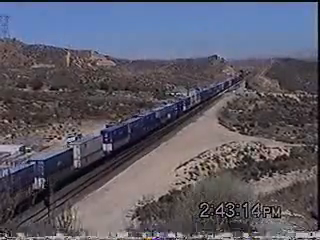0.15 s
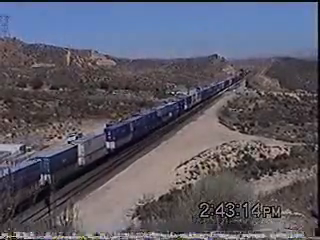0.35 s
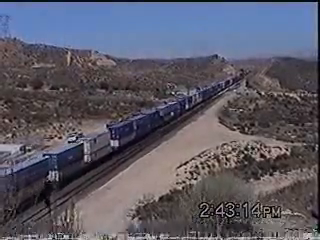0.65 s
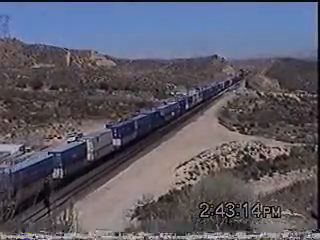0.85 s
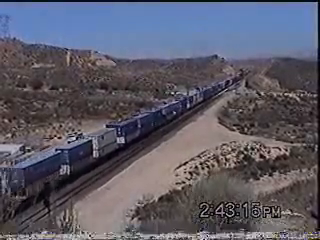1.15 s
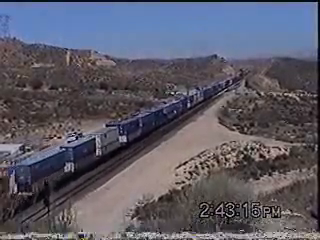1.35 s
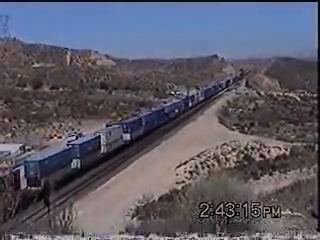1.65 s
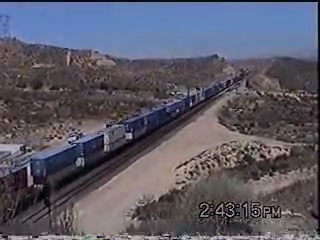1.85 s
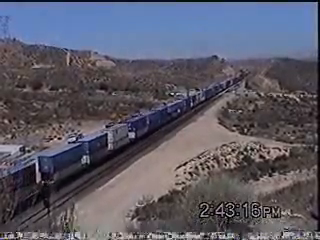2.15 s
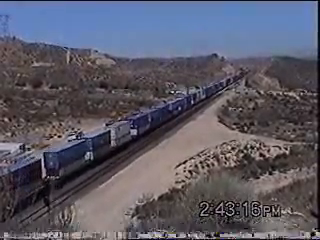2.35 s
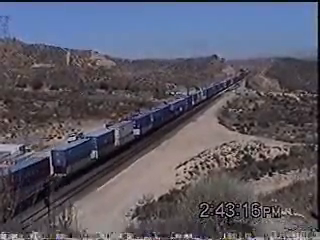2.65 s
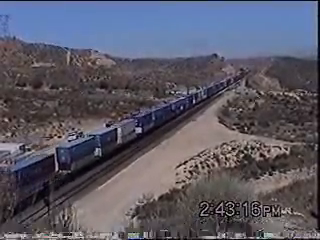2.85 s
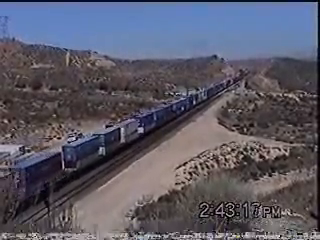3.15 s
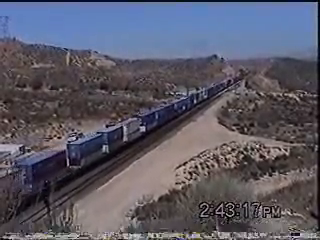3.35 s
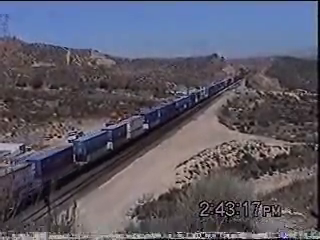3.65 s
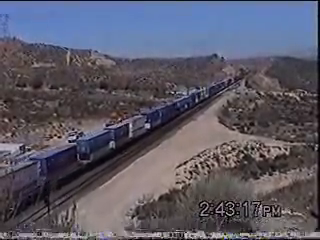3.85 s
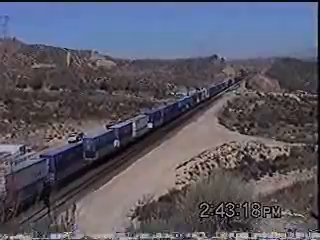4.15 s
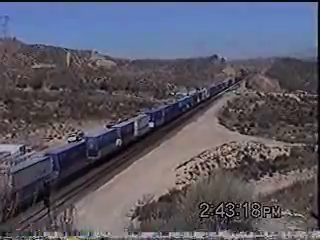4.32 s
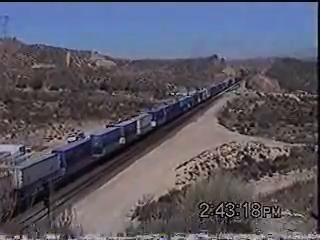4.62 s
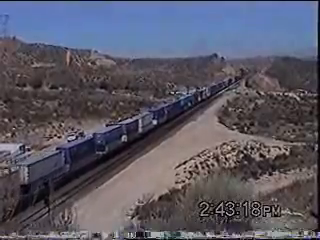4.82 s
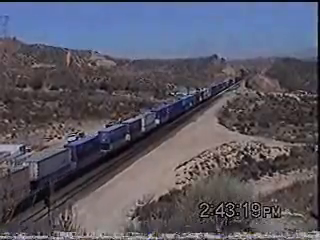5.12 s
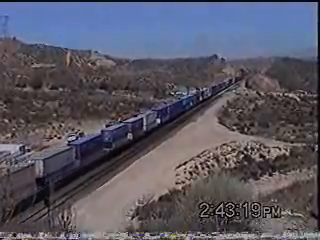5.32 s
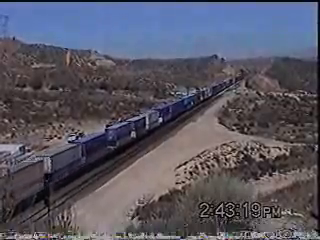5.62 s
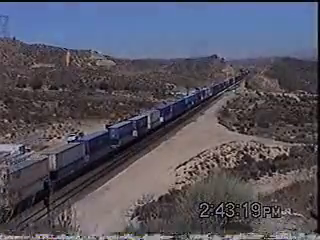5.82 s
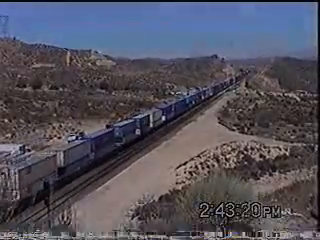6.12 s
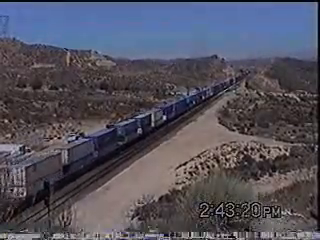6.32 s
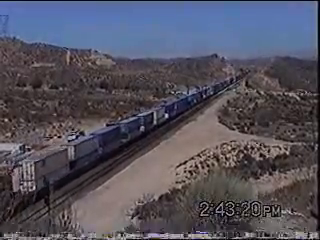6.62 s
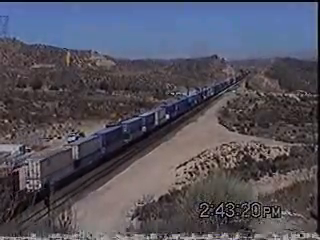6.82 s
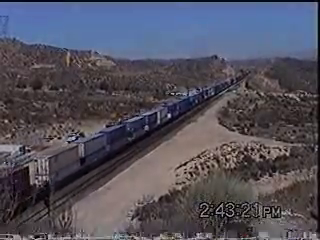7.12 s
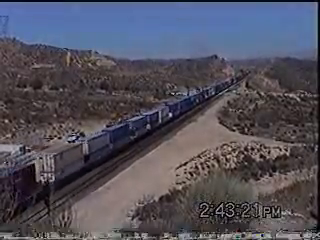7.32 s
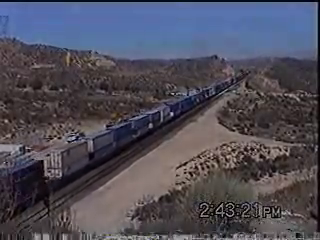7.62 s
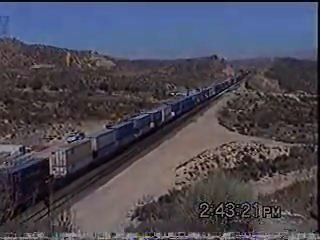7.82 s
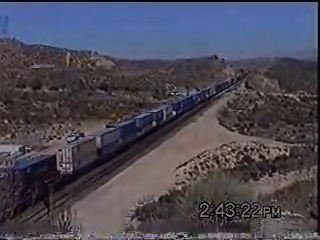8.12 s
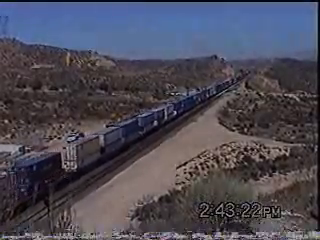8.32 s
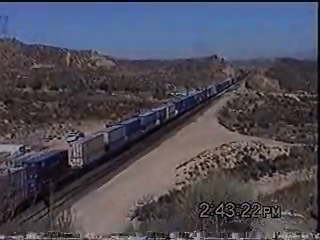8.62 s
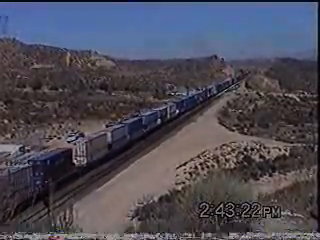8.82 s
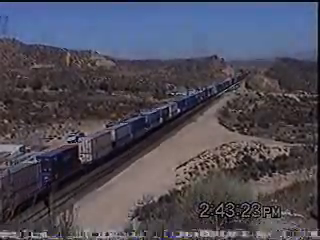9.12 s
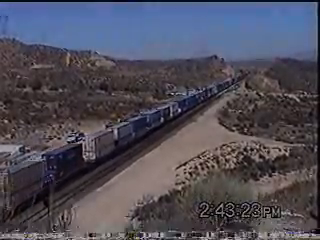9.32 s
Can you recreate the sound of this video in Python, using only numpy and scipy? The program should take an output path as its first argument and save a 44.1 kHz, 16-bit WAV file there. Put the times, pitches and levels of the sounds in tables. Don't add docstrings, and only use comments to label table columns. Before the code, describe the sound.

Outdoors beside a railway in dry hills, a long freight train passes throughout: a steady low rumble, mid-range rail roar and fine high wheel hiss, throbbing slightly and swelling a little as wagons go by. Soft wind thuds begin at 0.2 s; a violent gust breaks over the microphone from 0.6 to 1.2 s, with rough puffs, brief airy whistles and squared-off bass thumps. From about 1.7 to 4 s the train dominates, with only isolated thumps. Another sharp gust hits at 4.2-4.8 s, then calm. The longest rough burst runs from 5.8 to 7 s, strongly distorted. Short treble scrapes and a thin, unsteady flange squeal surface around 6.8-7.3 s. After a brief easing, breathy, fluttering gusts return from 7.8 s and continue unevenly to the end near 9.5 s, the train still rolling. Sound is close, mono, dull on top and overloaded in gusts.

```python
import sys
import numpy as np
from scipy import signal
from scipy.fft import rfft, irfft, next_fast_len
from scipy.io import wavfile
from scipy.ndimage import uniform_filter1d, map_coordinates

SR = 44100
rng = np.random.default_rng(int(sys.argv[2]) if len(sys.argv) > 2 else 0)


def invert_db(level):
    return 10 ** (np.asarray(level, dtype=float) / 20)


def digitize_waveform(pressure):
    field = np.atleast_2d(pressure).T
    bounded = np.clip(field, -1, 1)
    quanta = np.round(bounded * 32767).astype(np.int16)
    wavfile.write(sys.argv[1], SR, quanta)


N = 417627

# time_s, weight_db, tread_roughness_db
WAGONS = [(0, -22, -48.5), (1, -16, -44.5), (1.9, -22, -46), (2.55, -22.5, -46.5), (2.68, -19, -40),
          (2.93, -19.5, -43.5), (3.15, -23, -48), (3.5, -24, -48.5), (4.4, -18, -43), (5.2, -25.5, -45),
          (6.2, -17.5, -39), (7.4, -23.5, -42), (8.1, -19.5, -38.5), (9.47, -25, -37)]
# frequency_hz, level_db
RUMBLE_SPECTRUM = [(20, -6), (55, -13.5), (68, -5.5), (90, -1.5), (200, 1), (400, -4), (550, -13),
                   (800, -32.5), (1500, -68)]
# frequency_hz, level_db
RAIL_SPECTRUM = [(260, -31.5), (480, -8), (1000, -10), (1700, -13), (2700, -15), (3900, -21.5), (4500, -25),
                 (6000, -49.5), (9000, -120)]
# frequency_hz, level_db
HISS_SPECTRUM = [(2470, -24), (4200, -9.5), (4920, 7.5), (5310, 5), (5870, 4), (7400, -1.5), (9620, -35.5),
                 (16300, -120)]
# start_s, peak_db, hold_s
SCRAPES = [(0.355, -43, .012), (.73, -41.5, 0.01), (2.324, -44, 0.029), (2.682, -57, 0.045),
           (4.497, -45, 0.031), (4.71, -40, 0.03), (5.836, -29.5, 0.018), (6.853, -36.5, 0.065),
           (6.927, -39, .04), (7.05, -37, 0.054), (7.274, -40.5, .04), (7.51, -46, 0.035),
           (7.88, -40.5, .06), (8.166, -50.5, 0.023), (8.397, -47.5, 0.029)]
# pitch_hz, level_db
FLANGE_MODES = [
    (4880, -33.5),
    (5750, -39),
    (6150, -44),
]
# time_s, strength_db, eddy_size (0 large, 2 small)
WIND = [(0, -27.5, 0.92), (0.55, -27, -0.36), (0.75, -14, 1.4), (1.05, -17.5, 0.36), (1.5, -29.5, -0.0058),
        (2.5, -29.5, 0.18), (2.8, -29, 1.04), (3.2, -28.5, -0.11), (4.1, -27, 0.24), (4.4, -12.5, 1.4),
        (4.9, -27, 0.9), (5.7, -25.5, 0.29), (6.05, -10.5, 0.72), (6.5, -14, 1.13), (7.2, -23, 0.44),
        (8.1, -19, 1.17), (8.9, -17, 0.84), (9.47, -18, 0.75)]
# start_s, hold_s, strength_db, eddy_size (0 large, 2 small)
SWELLS = [(0.621, 0.069, -17, 1), (0.71, 0.14, -10, 0.88), (0.75, 0.13, -8.5, 2.5),
          (0.92, 0.092, -11.5, 0.97), (1.06, 0.14, -23.5, 2.4), (1.09, 0.066, -17, 0),
          (4.098, 0.035, -16.5, 0), (4.252, 0.17, -16.5, 0.99), (4.287, 0.07, -15.5, 0),
          (4.407, 0.22, -16, 2.7), (4.477, 0.12, -16, 0), (4.691, 0.075, -17, 0.85), (5.824, 0.2, -14, 1.7),
          (5.895, 0.035, -11, 2.2), (5.894, 0.085, -10, 0.36), (6.108, 0.11, -11.5, 0),
          (6.178, 0.24, -16, 1.7), (6.248, 0.06, -10.5, 0.21), (6.298, 0.3, -17, 0),
          (6.308, 0.23, -19.5, 1.8), (6.553, 0.013, -9, 1.3), (6.667, 0.047, -16, 2),
          (6.821, 0.14, -21, 0.5), (6.841, 0.025, -15.5, 2), (7.809, 0.2, -17, 0.34), (8.034, 0.26, -22, 2),
          (8.064, 0.14, -16.5, 0.2), (8.233, 0.2, -17, 0.86), (8.687, 0.032, -15, 1.2),
          (8.797, 0.24, -17, 1.2)]
# centre_hz, width_hz
EDDY_BANDS = [
    (430, 490),
    (1080, 920),
    (1850, 1030),
]
# centre_hz, width_hz, level_db (relative to them)
GRILLE_CAVITY = (3570, 520, -26)
# start_s, peak_db, pitch_hz, length_s
THUMPS = [(0.197, -6, 134, 0.023), (0.372, -10, 221, 0.04), (0.567, -2.5, 192, 0.03), (0.9, 0, 125.6, 0.03),
          (1.105, -3.5, 227, 0.05), (1.401, -10, 129, 0.015), (1.566, -2.5, 150, 0.023),
          (1.704, -3, 153, 0.023), (2.939, -7, 104, 0.023), (3.499, -14, 172, 0.031),
          (3.769, -2, 227, 0.021), (4.109, -10.5, 200, 0.046), (4.331, 5, 131.7, 0.042),
          (4.495, -3, 205, 0.03), (4.727, -2.5, 170.4, 0.03), (5.899, -3.5, 206, 0.033),
          (6.12, -4, 267, 0.044), (6.495, 0, 195, 0.03), (6.952, -6, 94.4, 0.032), (8.146, -5, 241, 0.035),
          (8.409, -18, 198, 0.027), (8.911, -4.5, 234, 0.034)]
# centre_s, depth_db (below 0 a slight lift), width_s
LULLS = [(0.621, 1, 0.023), (0.712, 8, 0.014), (0.763, 3, 0.028), (0.912, 6, 0.011), (1.04, 4, 0.034),
         (4.25, 2.5, 0.026), (4.404, 3, 0.03), (4.484, 3, 0.017), (4.643, 1.5, 0.029), (4.693, 5, 0.021),
         (5.823, 9, 0.015), (5.889, 9, 0.014), (6.106, 4, 0.011), (6.244, 6.5, 0.017), (6.31, 2, 0.019),
         (6.533, 2, 0.041), (6.649, 4, 0.019), (6.828, 3, 0.019), (6.92, 7.5, 0.019), (8.253, 2.5, 0.042),
         (8.381, 3, 0.029), (8.687, -1, 0.018), (8.756, -3, 0.017), (8.874, 0, 0.016)]
# start_s, peak_db, eddy_pitch_hz
PUFFS = [(.628, -3.5, 1180), (.689, 1, 1250), (.731, 3.5, 816), (.772, 13, 698), (.824, 5, 945),
         (.974, 1.5, 598), (4.214, -3.5, 704), (4.335, 7, 668), (4.415, 2.5, 514), (4.454, 2, 1164),
         (4.704, -0.5, 1550), (5.803, 1.5, 790), (5.899, 3.5, 546), (6.012, 2, 1086), (6.066, 5.5, 954),
         (6.185, 2, 720), (6.322, 2.5, 990), (6.483, 1.5, 1030), (6.614, -2.5, 1100), (6.657, 1, 1000),
         (6.864, 2, 1210), (6.9, 4, 1030), (6.937, 2, 970), (7.92, 0.5, 780), (8.047, -1.5, 745),
         (8.273, 0.5, 1340), (8.399, -2, 1080), (8.626, 0.5, 1130), (8.915, 3, 1134), (9.14, -5.5, 1226)]
# start_s, peak_db, pitch_hz
WHISTLES = [(.707, -18, 3640), (.809, -5, 3540), (.834, -10, 3920), (.876, -12.5, 3930), (4.259, -21, 3720),
            (4.3425, -3, 3760), (4.409, -17.5, 4200), (4.48, -18, 3940), (4.515, -18.5, 3640),
            (4.704, -21.5, 3870), (5.861, -12.5, 3920), (5.897, -19, 3800), (5.941, -17, 3860),
            (6.017, -9.5, 3760), (6.685, -22, 4200), (6.142, -9.5, 3920), (6.213, -17.5, 3910),
            (6.247, -14, 3800), (6.507, -16, 3870), (6.921, -17, 3800), (8.053, -14, 3560)]
# start_s, peak_db, eddy_pitch_hz
RIPPLES = [(.858, -1.5, 1100), (4.125, -7, 266), (4.286, -1.5, 800), (4.59, -1.5, 1890), (4.732, -3, 1540),
           (5.854, -3.5, 1960), (5.944, 4.5, 513), (6.112, 1.5, 505), (6.226, 4, 788), (6.254, 2, 603),
           (6.36, -2.5, 1086), (6.684, 2, 1570), (6.838, -2.5, 600), (7.88, -2.5, 2200), (8.11, -3, 1800),
           (8.3, 1, 1540), (8.35, 2.5, 1690), (8.42, -1, 1700), (8.702, 2, 1000), (8.766, 0.5, 1290),
           (8.825, -2, 863), (8.98, -2, 1200), (9.066, -2.5, 1030), (9.1, -3, 1240)]
# frequency_hz, gain_db
WINDSCREEN = [(60, -10.5), (110, 8), (1400, -2), (1950, -1), (2250, -3), (2900, -3), (3800, -1), (4300, -1),
              (4700, -11.5), (7000, -15.5)]
# frequency_hz, gain_db
TAPE_RESPONSE = [(6300, 1), (7200, -4), (7800, -9.5), (8300, -15), (8800, -91.5)]


def unit(x):
    return x / np.sqrt(np.mean(x ** 2) + 1e-20)


def smooth_rms(x):
    return np.sqrt(np.abs(uniform_filter1d(x ** 2, size=500)))


def curves(rows):
    time_s, *columns = np.transpose(rows)
    t = np.arange(N) / SR
    return [np.interp(t, time_s, column) for column in columns]


def wobble(rate_hz):
    knots = rng.standard_normal(int(N * rate_hz / SR) + 4)
    return map_coordinates(knots, [np.arange(N) * rate_hz / SR])


def filtered(x, response):
    m = next_fast_len(len(x) + 8192)
    spectrum = rfft(x, m) * response(np.fft.rfftfreq(m, 1 / SR))
    return irfft(spectrum, m)[:len(x)]


def colour(points):
    f, db = np.transpose(points)
    return lambda hz: invert_db(np.interp(np.log(hz + 1), np.log(f + 1), db))


def resonance(centre_hz, width_hz):
    def response(f):
        damping = 1j * f * width_hz
        return (damping / (centre_hz ** 2 - f * f + damping)) ** 2
    return response


def rush(response, patchy_db):
    z = signal.stft(rng.standard_normal(N), nperseg=512)[2]
    field = uniform_filter1d(rng.standard_normal(z.shape), size=4, axis=0)
    field = uniform_filter1d(field, size=5, axis=1)
    noise = signal.istft(z * invert_db(patchy_db * unit(field)), nperseg=512)[1][:N]
    return unit(filtered(noise, response))


def swell(start_s, hold_s, attack_s, release_s):
    t = np.arange(N) / SR - start_s
    return np.clip(t / attack_s, 0, 1) * np.exp(-np.clip(t - hold_s, 0, None) / release_s)


def flange_squeal(scrape):
    def modes(f):
        return sum(invert_db(db) * resonance(hz, 30)(f) for hz, db in FLANGE_MODES)
    tone = unit(filtered(rng.standard_normal(N), modes))
    t = np.arange(N) / SR
    near = np.exp(-((t - 6.99) / 0.17) ** 4)
    return scrape * invert_db(-0.5 + 2.2 * wobble(28)) * near * tone


def train():
    rumble_db, tread_db = curves(WAGONS)
    rail_db = -24.5 + 0.6 * (rumble_db - rumble_db.mean()) + 0.72 * (tread_db - tread_db.mean())
    scrape = sum(invert_db(db) * swell(start_s, hold_s, attack_s=0.021, release_s=0.02)
                 for start_s, db, hold_s in SCRAPES)
    tread = invert_db(tread_db) + scrape
    throb = wobble(9)
    rumble = invert_db(rumble_db + 1.6 * throb) * rush(colour(RUMBLE_SPECTRUM), patchy_db=-0.5)
    rail = invert_db(rail_db + 1.3 * throb) * rush(colour(RAIL_SPECTRUM), patchy_db=1.73)
    hiss = tread * invert_db(0.34 * wobble(4.7)) * rush(colour(HISS_SPECTRUM), patchy_db=-0.5)
    return rumble + rail + hiss + flange_squeal(scrape)


def eddy_gains():
    neighbour_db = 6
    sizes = np.arange(len(EDDY_BANDS))[:, None]

    def power_share(db, size):
        return invert_db(db - neighbour_db * (sizes - size) ** 2) ** 2

    power = power_share(*curves(WIND))
    for start_s, hold_s, db, size in SWELLS:
        envelope = swell(start_s, hold_s, attack_s=0.016, release_s=0.016)
        power = power + power_share(db, size) * envelope ** 2
    return invert_db(3.5) * np.sqrt(power)


def gusts():
    flutter, rattle, gains = wobble(30), wobble(140), eddy_gains()
    sound = np.zeros(N)
    for gain, (hz, width_hz) in zip(gains, EDDY_BANDS):
        own_flutter = wobble(45)
        lumps = unit(invert_db(0.16 * flutter + 1.0 * own_flutter + 1.2 * rattle))
        sound += invert_db(-3.5) * gain * lumps * rush(resonance(hz, width_hz), patchy_db=1.56)
    hz, width_hz, below_db = GRILLE_CAVITY
    ringing = rush(resonance(hz, width_hz), patchy_db=4)
    return sound + gains[-1] * invert_db(below_db + 2 * flutter) * ringing


def thumps():
    sound, t = np.zeros(N + SR), np.arange(SR // 4) / SR
    phases = rng.uniform(0, 2 * np.pi, (len(THUMPS), 2))
    for (start_s, db, hz, length_s), phase in zip(THUMPS, phases):
        swing = np.sin(2 * np.pi * hz * t + phase[0])
        swing += 0.54 * np.sin(2 * np.pi * 0.63 * hz * t + phase[1])
        push = np.sin(np.pi * np.clip(t / length_s, 0, 1)) ** 2
        sound[round(start_s * SR):][:len(t)] += invert_db(db - 5.5) * push * swing
    return sound[:N]


def lulls():
    t = np.arange(N) / SR
    depth_db = sum(db * np.exp(-(2 * (t - s) / width_s) ** 2) for s, db, width_s in LULLS)
    return invert_db(-1.3 * depth_db)


def bursts(rows, length_s, spread, crest_db, rise_s):
    sound, t = np.zeros(N + SR), np.arange(SR // 8) / SR
    shape = (1 - np.exp(-t / rise_s)) * np.exp(-(t / length_s) ** 3)
    air = rng.standard_normal((len(rows), len(t)))
    for (start_s, db, hz), noise in zip(rows, air):
        band = unit(filtered(noise, resonance(hz, spread * hz)))
        sound[round(start_s * SR):][:len(t)] += invert_db(db - crest_db) * shape * band
    return sound[:N]


def puffs():
    broad = bursts(PUFFS, length_s=0.016, spread=0.83, crest_db=13.0, rise_s=0.00065)
    whistles = bursts(WHISTLES, length_s=0.016, spread=0.073, crest_db=6.5, rise_s=0.0024)
    ripples = bursts(RIPPLES, length_s=0.024, spread=0.4, crest_db=11.5, rise_s=0.003)
    return broad + whistles + ripples


def scene():
    push = thumps()
    pinned = 1 / (1 + 0.5 * smooth_rms(push))
    wind = filtered(lulls() * pinned * gusts() + puffs(), colour(WINDSCREEN))
    return (train() + wind + push)[None]


def band_limit(x):
    return signal.sosfilt(signal.butter(12, 12900, fs=SR, output="sos"), x)


def record(dry):
    sound = dry[0]
    treble_level = smooth_rms(filtered(sound, resonance(1300, 2300)))
    heave = smooth_rms(sound)
    lift = np.maximum(3.2 * (treble_level - 0.14), 1.8 * (heave - 0.29))
    ceiling = np.clip(0.325 + lift, 0.325, 0.93)
    flat = sound / (1 + np.abs(sound / ceiling) ** 7) ** (1 / 7)
    taped = filtered(flat, colour(TAPE_RESPONSE))[None]
    mix = np.clip(taped, -1, 1)
    return band_limit(mix)


dry = scene()
out = record(dry)
digitize_waveform(out)
```